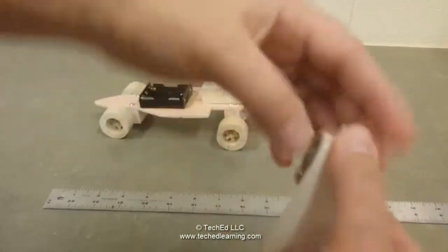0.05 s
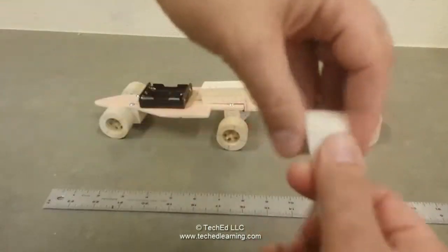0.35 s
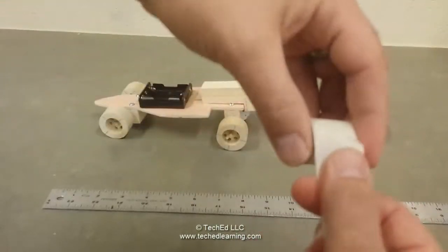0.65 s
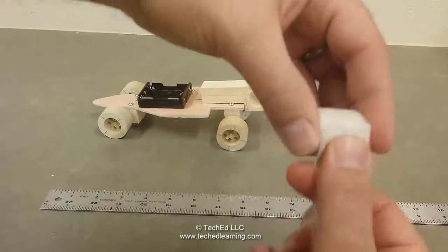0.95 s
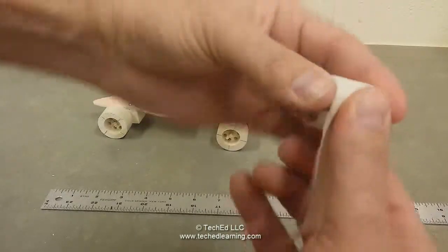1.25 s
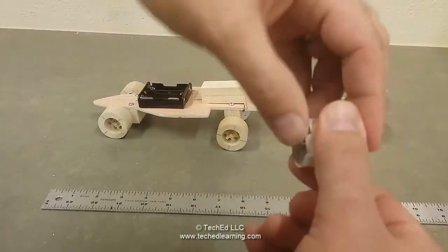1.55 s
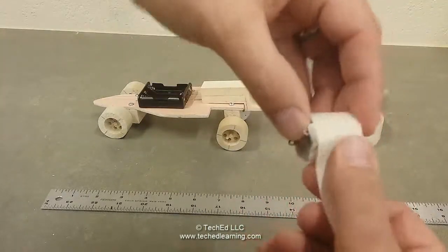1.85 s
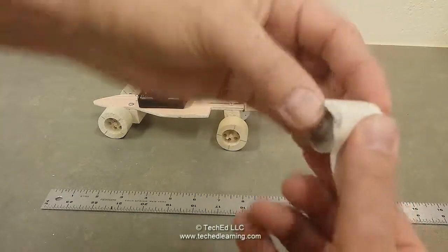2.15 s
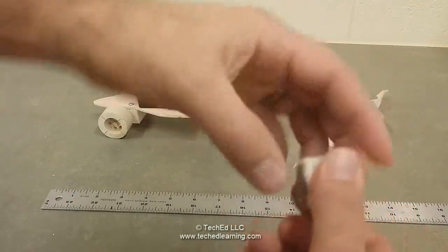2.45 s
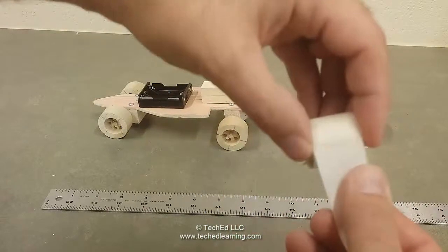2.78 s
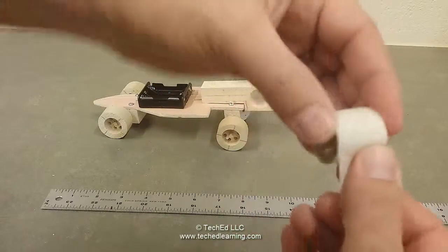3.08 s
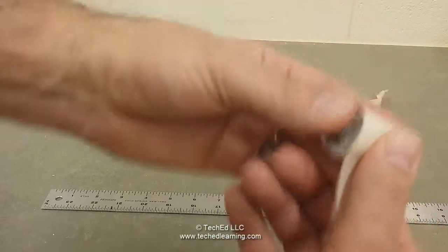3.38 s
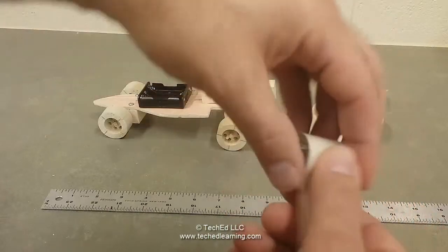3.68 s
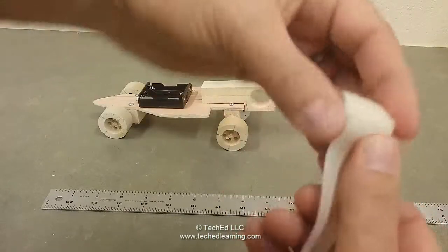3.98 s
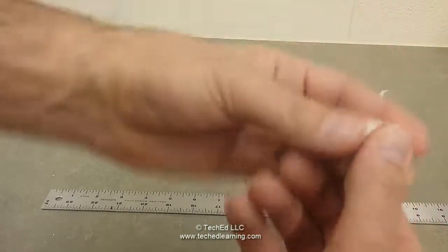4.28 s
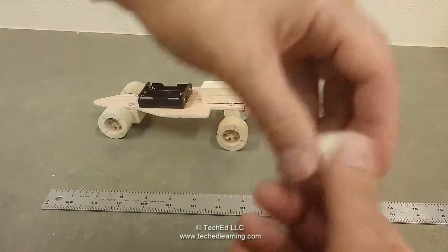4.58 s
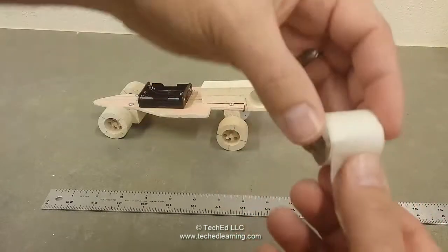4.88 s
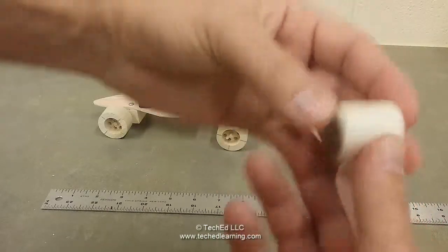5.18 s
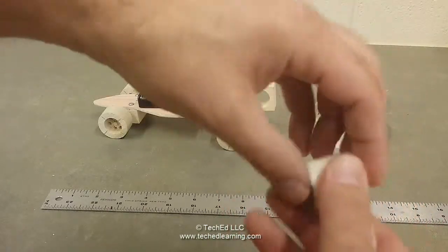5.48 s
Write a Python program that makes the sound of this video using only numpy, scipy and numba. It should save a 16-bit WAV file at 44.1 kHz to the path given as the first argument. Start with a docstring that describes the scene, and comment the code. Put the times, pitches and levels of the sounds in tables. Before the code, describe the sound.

Hands wind masking tape around a small motor close to the microphone. A short papery rasp with a burst of sharp snaps comes first, then irregular crisp rustles and sticky ticks separated by near-quiet pauses. Firmer rasps come around the middle and near the end. A faint ventilation rumble runs underneath in a small room.

```python
"""A short papery rasp and a burst of sharp snaps over a low ventilation rumble: two hands are winding
masking tape round a small motor, above a table in a small room, close to a camera's two microphone ports.
The crepe paper slides under the fingers in short strokes of dense micro-slips. Creases buckle and the
glue lets go with snaps that knock the motor. The table and the walls answer."""
import sys
import numpy as np
from scipy import signal
from scipy.fft import rfft, irfft, next_fast_len
from scipy.io import wavfile
from numba import njit

SR = 44100
rng = np.random.default_rng(int(sys.argv[2]) if len(sys.argv) > 2 else 0)


def store_wav(level_fs):
    """Save 16-bit WAV to argv[1]."""
    pcm = np.round(np.clip(np.atleast_2d(level_fs), -1, 1) * 32767)
    wavfile.write(sys.argv[1], SR, pcm.T.astype(np.int16))


N = 243873
TIME = np.arange(N) / SR

# the camera's automatic gain, as a set curve: it ducks the room tone after the first loud snaps,
# then slowly recovers: time_s, relative_gain_db
BACKGROUND_GAIN = [(0, -61.5), (.33, -60.5), (.39, -67), (1.2, -61.5), (2.5, -59), (3.3, -56.5), (4.6, -54),
                   (4.9, -56.5), (5.53, -56.5)]
# air of the room: frequency_hz, gain_db
AIR_SPECTRUM = [(25, -6), (45, -9), (62, 0), (82, -5.5), (120, 1), (225, 1.5), (300, -4.5), (400, -1.5),
                (560, -9.5), (1100, -17), (1950, -21), (2190, -17.5), (2600, -22.5), (7000, -25),
                (14500, -31)]
# the part of that air which differs between the ports: frequency_hz, gain_db
AIR_WIDTH = [(40, -9), (130, -14), (280, -13), (550, -2), (2000, 1)]
# fan and mains tones, relative to the air: pitch_hz, level_db
HUM_TONES = [(120, -17.5), (220.7, -13.5), (242, -16.5)]
# colour of the left microphone port against the right: frequency_hz, difference_db
PORT_DIFFERENCE = [(200, -10), (1300, 4), (2400, -2.5), (4300, 7.5), (6500, 4.5), (8500, -9), (12000, -9.5),
                   (15000, -13.5)]
# crack of a crease of middle size: frequency_hz, gain_db
CRACK_SPECTRUM = [(200, -32), (600, -22), (1200, -19), (2800, -7), (4400, 5.5), (8500, 7.5), (12000, -5.5),
                  (16000, -11)]
# wrapped motor and cupped hand, knocked by a snap: frequency_hz, gain_db
BODY_SPECTRUM = [(120, -30), (420, -17), (660, 1.5), (950, -21), (1450, -1), (1800, 5), (2300, -10),
                 (3200, -4.5), (5000, -28.5)]
# the clearest snaps of creases and glue; positive pan is left:
# start_s, relative_level_db, pitch_hz, crackle_decay_s, relative_body_db, pan_db
CLEAR_SNAPS = [(0.0148, -58.5, 4090, 0.00087, 6, -7), (0.2935, -22, 5050, 0.00046, -17, 11),
               (0.3246, -17, 7250, 0.0023, -24, 0), (0.3271, -18, 6900, 0.0031, -9, -1),
               (0.3345, -19, 6300, .003, -15, 2.5), (0.3516, -23.5, 5500, .0012, -9.5, 0),
               (0.4346, -41, 5300, 0.00083, -18, 9), (1.0594, -27.5, 8500, 0.00076, -19, -2),
               (1.0741, -21.5, 9560, 0.0014, -20.5, -1.5), (1.2571, -44, 9900, 0.0014, -27, -4),
               (1.3009, -46, 7600, .0007, -22, 5), (1.3276, -50, 6500, .0009, -23, 5),
               (1.3577, -41.5, 7460, 0.001, -28, 0), (1.7347, -40, 5400, .0009, -24, 12),
               (2.0495, -33, 8000, 0.0018, -22, 3), (2.0546, -26.5, 7560, 0.00081, -24, 3.5),
               (2.2915, -43, 6200, .0009, -21, 3), (2.3341, -45, 7300, 0.001, -18, -1),
               (2.7652, -32, 7500, .0009, -21, -3), (2.9729, -42, 6920, 0.0028, -23, 0),
               (3.1328, -31.5, 6560, .0014, -30, 3), (3.1788, -20.5, 7460, 0.0011, -15.5, -3.5),
               (3.5377, -39, 5440, .0015, -13, 0), (3.6084, -36.5, 7050, 0.001, -20, 2),
               (3.8790, -36, 7580, 0.00078, -24, -6), (3.8915, -33, 7600, .001, -28, -5),
               (4.7961, -36, 8250, 0.0012, -25, 4), (5.0253, -27, 7660, .0009, -12.5, 4),
               (5.2270, -36, 7200, 0.0006, -21, -4), (5.2505, -37, 9500, 0.0023, -27, -6.5),
               (5.2805, -41, 7960, 0.0011, -18, -4.5), (5.2824, -42, 3400, .001, -24, -5)]
# paper brushed lightly by the skin: frequency_hz, gain_db
BRUSHED_SPECTRUM = [(200, -3), (1100, -9), (2300, -4.5), (3400, -5), (4400, -1.5), (6200, 1.5), (7800, -1),
                    (9400, -2.5), (11000, -5.5), (14200, -8), (15500, -46)]
# crepe paper pulled firmly: frequency_hz, gain_db
PULLED_SPECTRUM = [(120, -19.5), (350, -15.5), (700, -15), (1150, -20), (2300, -12), (3500, -10.5),
                   (4150, -3), (6100, -1.5), (7800, -1.5), (9400, -1.5), (10300, -6), (14000, -11),
                   (16000, -32)]
# between strokes the fingers never quite rest on the paper: time_s, relative_level_db
LIGHT_TOUCH = [(0, -70), (.5, -66.5), (.7, -77), (.9, -76.5), (1.31, -68.5), (1.57, -61.5), (1.88, -71.5),
               (2.33, -61), (2.45, -69), (3.5, -66), (4.08, -54), (4.88, -67), (5.3, -62.5), (5.53, -64)]
# finger strokes; level and ring are those at the end of the hold, crispness lifts the top treble:
# full_grip_s, hold_s, relative_level_db, attack_s, release_s, ring_hz, crispness, leftward_pan
FINGER_STROKES = [(0.101, .006, -39.5, .025, .035, 5050, -14, 1),
                  (0.323, .012, -29, .07, .055, 6050, -7, 4.5),
                  (0.431, 0.007, -45, 0.065, .05, 4930, -6, 4.5),
                  (1.009, .01, -52, .06, 0.065, 6800, -3, 1), (1.071, .005, -32, .045, .033, 7700, -8, 0),
                  (1.184, .025, -54.5, .08, .06, 7200, -5, 3.5), (1.259, .01, -54, .012, .04, 7680, 1, 1),
                  (1.355, .022, -47.5, .012, 0.046, 6420, 9, 8),
                  (1.450, .035, -55.5, .08, .03, 6000, 9, 1.5),
                  (1.712, 0.032, -40, 0.046, 0.045, 5230, -9, 5.5),
                  (1.765, 0.013, -36, .045, .048, 6030, -7, 2.5),
                  (1.926, .005, -57, 0.027, .04, 5500, -8, 0), (2.019, .008, -53.5, .03, .04, 7400, 2, -1),
                  (2.048, 0.0056, -39, .012, .016, 7200, 1, -3),
                  (2.106, 0.0044, -54.5, .03, .06, 5460, -13, -1),
                  (2.211, .03, -54, .03, .14, 6550, -7, -3.5),
                  (2.357, .008, -56.5, .03, .025, 7000, -8, -6),
                  (2.521, .008, -61.5, .06, 0.027, 8000, 5, -5),
                  (2.614, .004, -43, .02, 0.064, 4800, -5, 4), (2.656, .012, -34, .022, 0.036, 4980, -7, 6),
                  (2.694, .066, -26.5, .05, .03, 7700, -7.5, 2), (3.086, .005, -50.5, .04, .04, 6200, 0, 0),
                  (3.135, 0.0033, -45, .004, .035, 5600, 4, 4),
                  (3.163, .016, -30, .02, .026, 6610, -13, 0.5),
                  (3.323, 0.0072, -43, 0.018, .04, 8500, -1, -1.5),
                  (3.444, 0.024, -51, .03, .05, 6730, -5, -3), (3.601, .01, -49, .1, .04, 5830, -3, 2),
                  (3.657, .008, -44.5, .03, .13, 6200, 5, 8), (3.811, 0.02, -49, .08, .08, 6800, 1, 4.5),
                  (3.882, .01, -29, 0.02, .09, 7500, 0.5, 0.5),
                  (4.203, .008, -35, .06, .035, 5400, -11, 0.5), (4.336, .04, -47.5, .15, .08, 6200, -8, 3),
                  (4.427, 0.0087, -46.5, 0.072, .1, 5840, -6, 2),
                  (4.580, .07, -27, .045, .06, 6130, -9.5, 3.5), (4.700, .025, -22, .08, .062, 7500, -3, 1),
                  (5.026, .02, -41.5, .05, .06, 6600, -3, -0.5), (5.078, .015, -47, .04, .04, 6560, 2, 0),
                  (5.196, .01, -42, .016, .05, 6300, -1, 4.5),
                  (5.248, .005, -42.5, .025, .11, 7750, 2.5, -1)]


def undb(db):
    """Decibels to gain."""
    return 10 ** (np.asarray(db) / 20)


def unit(x):
    """Scale to rms 1."""
    return x / np.sqrt(np.mean(x ** 2))


def per_ms(x):
    """Scale to the energy of one millisecond at rms 1."""
    energy = np.mean(np.sum(np.atleast_2d(x) ** 2, axis=1))
    return x * np.sqrt(SR / 1000 / energy)


def curve(rows):
    """Join (time_s, value) points by straight lines."""
    return np.interp(TIME, *np.transpose(rows))


def walk(per_s):
    """Random values joined by straight lines, at rms 1."""
    return unit(np.interp(TIME * per_s, np.arange(N // 40), rng.standard_normal(N // 40)))


def sides(pan_db):
    """Left and right gains of constant total power."""
    gains = np.array([undb(pan_db / 2), undb(-pan_db / 2)])
    return gains / np.sqrt(np.mean(gains ** 2, axis=0))


def colour(x, points, power=1, size=4096):
    """Minimum-phase filter through (frequency_hz, gain_db) points."""
    hz, db = np.transpose(points)
    grid_hz = np.maximum(np.arange(size // 2 + 1) * SR / size, 1)
    gain = undb(power * np.interp(np.log(grid_hz), np.log(hz), db))
    cepstrum = irfft(np.log(gain))
    cepstrum[1:size // 2] *= 2
    cepstrum[size // 2 + 1:] = 0
    response = irfft(np.exp(rfft(cepstrum)))
    length = next_fast_len(x.shape[-1] + size, True)
    return irfft(rfft(x, length) * rfft(response, length), length)[..., :x.shape[-1]]


@njit
def resonate(x, hz, width_hz):
    """Band-pass whose centre moves, gain 1 at the centre."""
    out, band_state, low_state = np.empty(len(x)), 0., 0.
    for i in range(len(x)):
        tuning, damping = np.tan(np.pi * hz[i] / SR), width_hz / hz[i]
        band = (band_state + tuning * (x[i] - low_state)) / (1 + tuning * (tuning + damping))
        band_state = 2 * band - band_state
        low_state += 2 * tuning * band
        out[i] = damping * band
    return out


def ventilation(gain_db):
    """Room tone: air rumble, alike at both ports in the bass, with faint wavering fan and mains tones."""
    mid = colour(rng.standard_normal(N), AIR_SPECTRUM)
    side = colour(colour(rng.standard_normal(N), AIR_SPECTRUM), AIR_WIDTH)
    air = np.array([mid + side, mid - side]) / np.std(mid)
    hum = np.zeros(N)
    for hz, db in HUM_TONES:
        amplitude = np.sqrt(2) * undb(db + 2 * walk(4.7))
        wavering_hz = hz * (1 + 0.0092 * walk(29.93))
        hum += amplitude * np.sin(2 * np.pi * np.cumsum(wavering_hz) / SR)
    return (air + hum) * undb(curve(BACKGROUND_GAIN) + gain_db)


def room(x, table_s, table_db, t60_s, wall_db):
    """The direct sound, one bounce off the table and the short diffuse ring of the walls."""
    t = np.arange(SR // 2) / SR
    tail = rng.standard_normal((2, len(t))) * undb(-60 * t / t60_s) * np.clip(t / 0.0015, 0, 1)
    response = tail * undb(wall_db) / np.sqrt(np.sum(tail[0] ** 2))
    response[:, 0] += 1
    response[:, int(table_s * SR)] += undb(table_db)
    return signal.fftconvolve(x, response, axes=1)[:, :N]


def microphone_ports(left, right):
    """Each port colours the close sound its own way."""
    return np.array([colour(left, PORT_DIFFERENCE, power=.5, size=256),
                     colour(right, PORT_DIFFERENCE, power=-.5, size=256)])


def hand_bounces(x):
    """Bounces off the moving fingers and palms comb the sound with shifting peaks and notches."""
    out = x
    for lag_s in (.0009, .0023):
        moving_lag_s = lag_s * (1 + .08 * walk(5))
        out = out + .25 * np.interp(TIME - moving_lag_s, TIME, x)
    return out


def small_creases(level_db, count, pitch_hz=7500, crackle_s=0.0011, body_db=-19):
    """Rows like CLEAR_SNAPS: creases give way at random, likelier and louder under harder rubbing."""
    odds = np.cumsum(undb(level_db) ** .3)
    starts = np.searchsorted(odds, rng.random(count) * odds[-1])
    return [(i / SR, level_db[i] - 3.5 - 1.5 * softness, pitch_hz * 2 ** (0.23 * facet),
             crackle_s, body_db, 3 * turn)
            for i, (softness, facet, turn) in zip(starts, rng.standard_normal((count, 3)))]


def snaps(rows, crackle_db, ring_t60_s, ring_db, knock_s, knock_db, gain_db):
    """A crease flips: a click with a short crackle, a brief ring of the facet and a knock in the body."""
    t = np.arange(1024) / SR
    out = np.zeros((2, N + len(t)))
    for start_s, level_db, pitch_hz, crackle_s, body_db, pan_db in rows:
        # partly the same at both ports
        noise = rng.standard_normal(len(t)) + 0.94 * rng.standard_normal((2, len(t)))
        click = per_ms(1. * (t == 0))
        crackle = undb(crackle_db) * per_ms(noise * np.exp(-t / crackle_s))
        # a smaller facet shifts the whole crack upwards
        spectrum = [(hz * pitch_hz / 7000, db) for hz, db in CRACK_SPECTRUM]
        crack = per_ms(colour(click + crackle, spectrum, size=256))
        ring = per_ms(np.sin(2 * np.pi * pitch_hz * t) * undb(-60 * t / ring_t60_s))
        # the grip damps the body within a few milliseconds
        knock = per_ms(colour(noise[:, ::-1] * np.exp(-t / knock_s), BODY_SPECTRUM, size=512))
        snap = per_ms(crack + undb(ring_db) * ring) + undb(body_db + knock_db) * knock
        start = int(start_s * SR)
        out[:, start:start + len(t)] += snap * undb(level_db + gain_db) * sides(pan_db)[:, None]
    return out[:, :N]


def grip(touch_ring_hz=6200, touch_crispness=-8.5, swell_db_per_s=55, tighten_hz_per_s=22000):
    """Each stroke rises, grows louder and higher as the tape tightens, then fades; all blend by power."""
    total = undb(curve(LIGHT_TOUCH) + 1.5 * walk(14)) ** 2
    ring_sum, crisp_sum, pan_sum = total * touch_ring_hz, total * touch_crispness, 0
    for full_grip_s, hold_s, level_db, attack_s, release_s, ring_hz, crispness, pan in FINGER_STROKES:
        remaining_s = full_grip_s + hold_s - TIME
        slack_s = np.clip(remaining_s, 0, hold_s)
        fade = np.maximum(full_grip_s - TIME, 0) / attack_s + np.maximum(-remaining_s, 0) / release_s
        fade_db = 20 * np.minimum(fade, 10)  # attack and release each span 20 dB
        power = undb(level_db - swell_db_per_s * slack_s - fade_db) ** 2
        total += power
        ring_sum += power * (ring_hz - tighten_hz_per_s * slack_s)
        crisp_sum += power * crispness
        pan_sum += power * pan
    return 10 * np.log10(total), ring_sum / total, crisp_sum / total, pan_sum / total


def micro_slips(spectrum, count, stereo_spread):
    """Tiny clicks of uneven size; each radiates its own way, so the two ports share only a part."""
    starts = rng.integers(0, N, count)
    sizes = undb(0.5 * np.minimum(rng.exponential(size=count), 4))
    at_ports = sizes * (rng.choice([-1, 1], count) + stereo_spread * rng.standard_normal((2, count)))
    clicks = unit(np.array([np.bincount(starts, port, N) for port in at_ports]))
    return colour(clicks, spectrum, size=512)


def sliding_paper(level_db, ring_hz, crispness, pan):
    """Crepe ridges catch and slip: dense under a firm stroke, grainy under a light touch."""
    firmness = np.clip((level_db + 49.5) / 14, 0, 1)
    brushed = micro_slips(BRUSHED_SPECTRUM, count=18000, stereo_spread=1.07)
    brushed = unit(brushed * undb(0.98 * walk(55)))  # a light touch catches and lets go unevenly
    pulled = unit(micro_slips(PULLED_SPECTRUM, count=55000, stereo_spread=1.14))
    paper = (np.sqrt(1 - firmness) * brushed + np.sqrt(firmness) * pulled) * undb(walk(220))
    # tension tunes the free span of tape
    span = np.array([resonate(port, np.clip(ring_hz, 2000, 14000), width_hz=1330.0) for port in paper])
    paper = unit(paper + undb(-4.5 - 1.6 * firmness) * span)
    # sharper slips add to the top treble
    treble = signal.sosfiltfilt(signal.butter(2, 8500, "high", fs=SR, output="sos"), paper)
    lift = undb(0.76 * (crispness + 2.5))
    paper = (paper + (lift - 1) * treble) / np.sqrt(0.99 + 0.23 * lift ** 2)
    return paper * undb(level_db - 1.0) * sides(1.12 * pan - 1.0)


def scene():
    """Tape in the hands close to the microphone, with the small room and its ventilation behind."""
    level_db, ring_hz, crispness, pan = grip()
    tape = sliding_paper(level_db, ring_hz, crispness, pan)
    tape += snaps(CLEAR_SNAPS + small_creases(level_db, count=36), crackle_db=2.5,
                  ring_t60_s=0.0049, ring_db=-8.5, knock_s=0.003, knock_db=3.5, gain_db=-0.46)
    close = microphone_ports(hand_bounces(tape[0]), hand_bounces(tape[1]))
    return room(close, table_s=0.0045, table_db=-14, t60_s=0.23, wall_db=-17) + ventilation(gain_db=1.64)


def record(dry):
    """The camera cuts the treble steeply above 15.7 kHz."""
    return signal.sosfilt(signal.ellip(8, .2, 70, 15700, fs=SR, output="sos"), dry)


dry = scene()
out = record(dry)
store_wav(out)
```